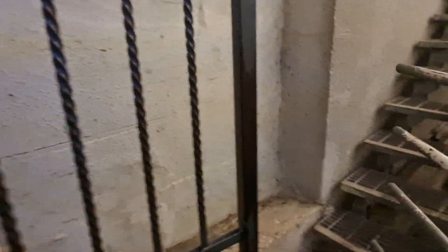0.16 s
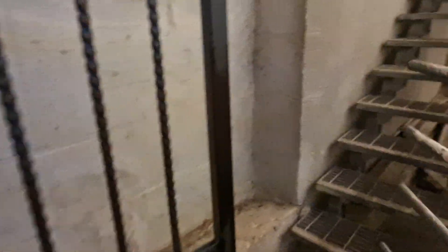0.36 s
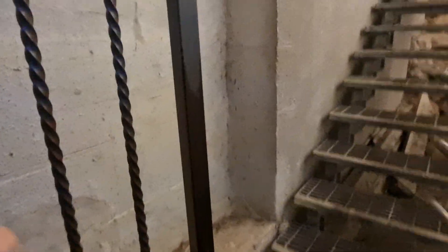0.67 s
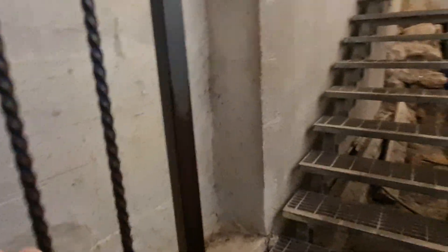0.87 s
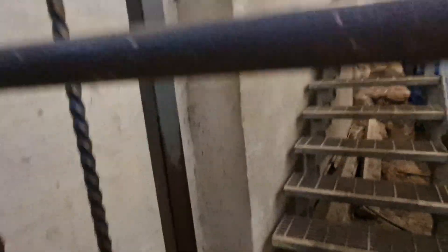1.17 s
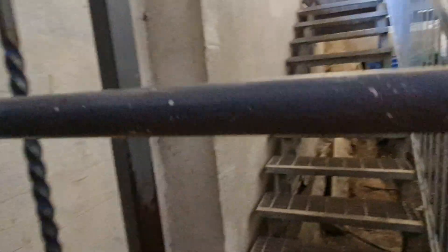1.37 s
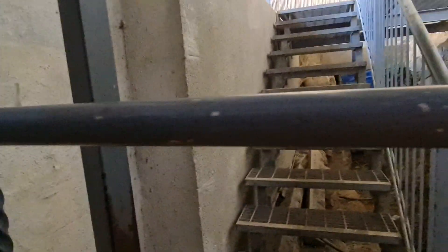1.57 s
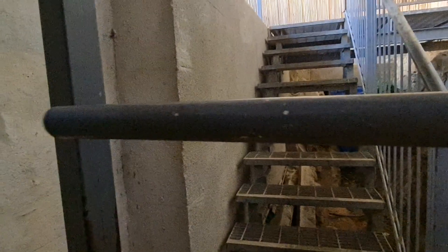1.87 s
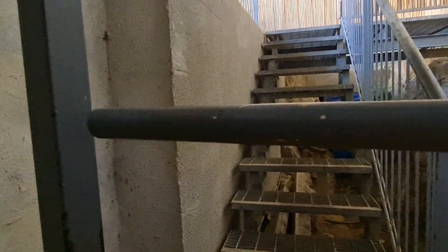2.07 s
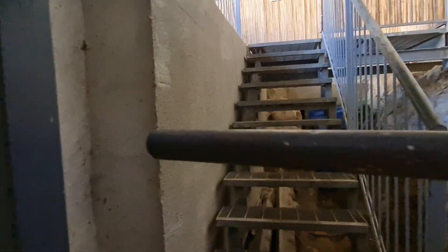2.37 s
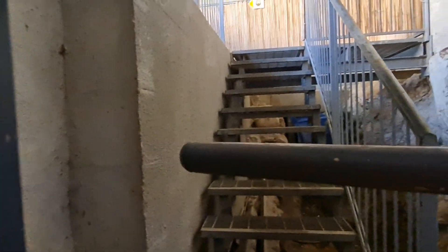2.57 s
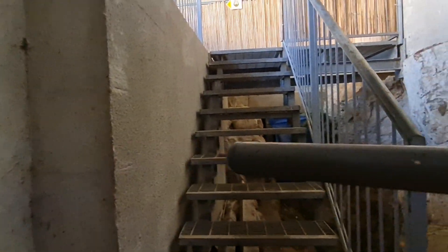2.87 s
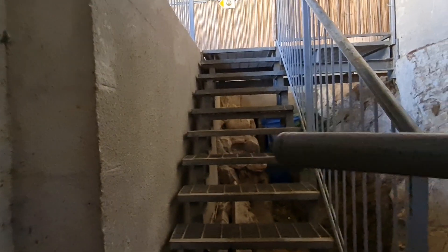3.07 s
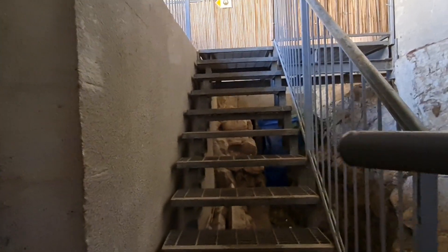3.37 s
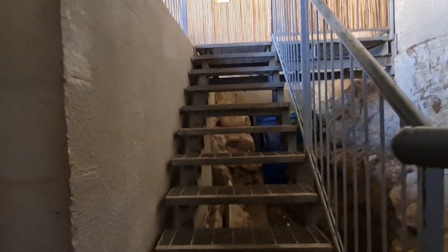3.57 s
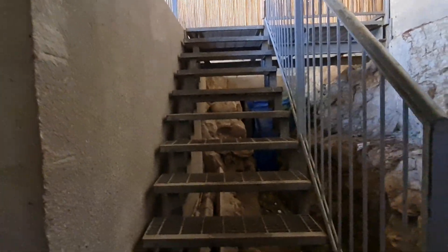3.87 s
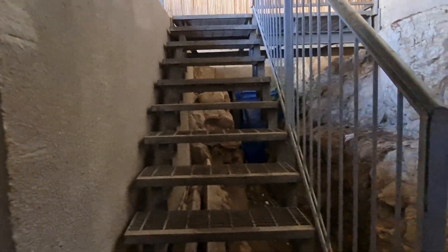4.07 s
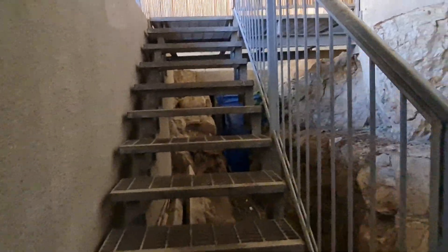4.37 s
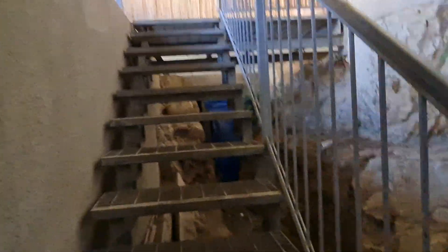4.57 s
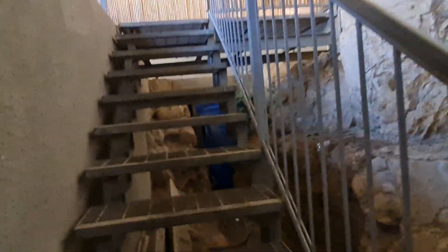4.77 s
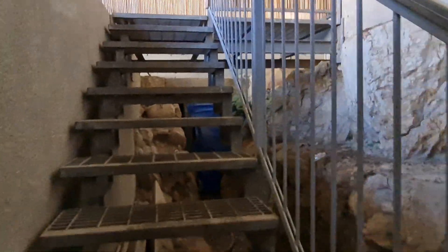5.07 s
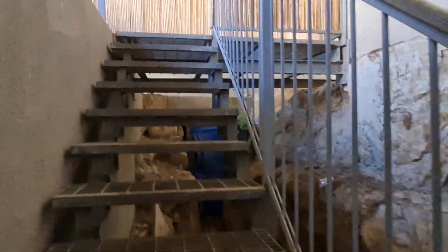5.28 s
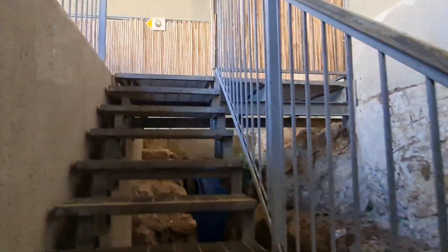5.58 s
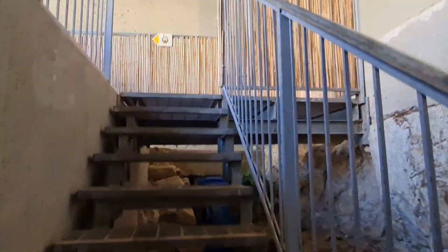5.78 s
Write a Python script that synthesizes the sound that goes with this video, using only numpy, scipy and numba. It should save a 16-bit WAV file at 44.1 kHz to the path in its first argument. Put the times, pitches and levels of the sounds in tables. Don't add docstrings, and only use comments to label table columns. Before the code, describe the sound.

A steel turnstile latch clanks about once a second, each blow ringing metallically through bars and grated stairs over faint traffic rumble.

```python
import sys
import numpy as np
from scipy import signal
from scipy.fft import rfft, irfft, next_fast_len
from scipy.io import wavfile
from scipy.ndimage import uniform_filter1d
from numba import njit

SR = 44100
rng = np.random.default_rng(int(sys.argv[2]) if len(sys.argv) > 2 else 0)


def invert_db(x):
    u = np.asarray(x, float) / 20
    return 10 ** u


def wav_record(signal):
    frames = np.transpose(np.atleast_2d(signal))
    bounded = np.clip(frames, -1, 1)
    quanta = np.round(bounded * 32767).astype(np.int16)
    wavfile.write(sys.argv[1], SR, quanta)


N = 261072

LEAD = 256
SCATTER = 0.13
# pitch_hz, level_db
PASSED_RANGE = [(110, -40), (320, 0), (16350, 0), (16650, -60)]


def curve(table, hz):
    table = np.array(table)
    return np.interp(np.log(np.maximum(hz, 1)), np.log(table[:, 0]), table[:, 1])


def colour(x, table):
    size = 2 * next_fast_len(x.shape[-1] // 2 + 1024)
    hz = np.arange(size // 2 + 1) * SR / size
    return irfft(rfft(x, size) * invert_db(curve(table, hz)), size)[..., :x.shape[-1]]


def unit(x):
    return x / np.sqrt(np.mean(x ** 2))


@njit
def ring(hz, gain, t60, size):
    p = np.exp(2j * np.pi * hz / SR - np.log(1000) / (t60 * SR))
    out = np.zeros(size)
    for k in range(len(hz)):
        z = gain[k] + 0j
        for i in range(min(size, int(1.3 * t60[k] * SR))):
            out[i] += z.imag
            z *= p[k]
    return out


def lines(modes, size, tubes=3):
    hz, db, t60 = np.repeat(np.array(modes, float).T, tubes, axis=1)
    is_extra_tube = np.arange(len(hz)) % tubes > 0
    detune = 0.004 * rng.standard_normal(len(hz)) * is_extra_tube
    return ring(hz * (1 + detune), invert_db(db - 4), np.clip(t60, 0.05, 1.8), size)


def add(out, s, sound):
    at = int(s * SR)
    sound = sound[:, max(-at, 0):N - at]
    out[:, max(at, 0):max(at, 0) + sound.shape[1]] += sound


def frame(size, count=3600):
    # pitch_hz, level_db per Hz
    cloud_level = [(200, -17), (638, -9.5), (3540, -6), (5500, -9), (8150, -5), (8350, -15), (14100, -16),
                   (16000, -35.5)]
    # pitch_hz, t60_s
    cloud_t60 = [(200, 3.8), (500, 1.47), (1200, 0.9), (2000, 1.11), (2600, 0.67), (3300, 0.75),
                 (5000, 0.52), (15000, 0.26)]
    # pitch_hz, width_hz, level_db
    crowds = [(1364, 250, 6.5), (7390, 560, 4)]
    chance = rng.standard_normal((count, 2)).T
    hz = 170 + 16300 * rng.random(count) ** 1.5
    damped = rng.random(count) < 0.5
    t60 = curve(cloud_t60, hz) * np.exp(SCATTER * chance[0]) * np.where(damped, 0.53, 1)
    db = curve(cloud_level, hz) + 11 - 2.5 * damped
    for at, width, crowd_db in crowds:
        db = db + crowd_db * np.exp(-((hz - at) / width) ** 2)
    crowding = (hz / 3000) ** 0.08
    gain = invert_db(db) * crowding * np.tanh(2 * chance[1]) / np.sqrt(count * t60)
    return ring(hz, gain, t60, size)


def rails(size, count=24):
    # pitch_hz, width_hz, level_db, t60_s
    rod_bands = [(330, 80, -19, 1.7), (900, 90, -16, 1.5), (1350, 120, -12, 1.2), (1450, 100, -4, .4),
                 (2620, 90, -17, .9), (4200, 120, -14, .7), (1750, 90, -14, 1.3), (1980, 90, -14, 1.4),
                 (2830, 60, -19, 1.2), (3040, 70, -8, 1.3), (4580, 90, -17, .78), (6200, 300, -17, .55),
                 (7780, 170, -14, .66)]
    hz, width, db, t60 = np.repeat(np.array(rod_bands, float).T, count, axis=1)
    chance = rng.standard_normal((3, len(hz)))
    gain = invert_db(db) * chance[1] / np.sqrt(count)
    t60 = np.clip(t60, 0.1, 1.8) * np.exp(SCATTER * chance[2])
    return ring(hz + width * chance[0], gain, t60, size)


def steel_bodies(size):
    # pitch_hz, level_db, t60_s
    posts = [(190, -16, 1.2), (240, -19, 1.6), (306, -17, 1.8), (350, -22, 1.3), (390, -21, 1.1),
             (484, -22, 1.0), (592, -21, 1.5), (631, -19, 1.1), (819, -19, .9), (884, -17, 1.2),
             (1420, -7, .5), (1568, -9, .45), (1728, -9, .55)]
    # pitch_hz, level_db, t60_s
    cage_bars = [(2103, -2, .55), (2151, -7, .55), (2253, -4, .5), (2376, -7, .4), (2522, -3, .45),
                 (2776, -12, .8), (2860, -10, .7), (3105, -12, .8), (3368, -12, .45)]
    railing_db, cage_db = -6.5, -12
    bodies = np.array([frame(size) + invert_db(railing_db) * rails(size) for _ in range(3)])
    return bodies + invert_db(railing_db) * lines(posts, size) + invert_db(cage_db) * lines(cage_bars, size)


def blow(bodies, own, db, low_db, bright_db, spread):
    walls_db, walls_t60_s = -13.5, 0.23
    port_lag = 18
    alike = 0.62
    t = np.arange(32768) / SR
    quick, slow, echo = rng.standard_normal((3, 3, len(t)))
    quick = quick * (1 - np.exp(-t / (0.04 * spread))) * np.exp(-(t / (0.72 * spread)) ** 1.73)
    slow = colour(slow, [(2800, -2.0), (4000, -19.5)]) * invert_db(-3)
    slow = slow * (1 - np.exp(-t / (0.72 * spread))) * np.exp(-(t / (1.78 * spread)) ** 4.6)
    echo = colour(echo, [(3000, 3.5), (4500, -8.5), (8000, -16.5), (10000, -21.5)])
    echo = echo * (1 - np.exp(-t / 0.01)) * invert_db(walls_db - 60 * t / walls_t60_s)
    push = (quick + slow + echo) / np.sqrt(spread * SR)
    heard = signal.fftconvolve(push, bodies, axes=1)
    heard[:, :len(own)] += [np.roll(own, lag) for lag in rng.integers(0, 200, 3)]
    shared, left, right = heard
    near = np.array([np.roll(shared, port_lag), shared])
    apart = colour(np.array([left, right]), [(200, -14), (800, 0)])
    sound = alike * near + np.sqrt(1 - alike ** 2) * apart
    tone = [(300, low_db - 5), (600, low_db), (1200, 0.0028), (3500, 0.012), (6000, bright_db)]
    return colour(np.pad(sound, ((0, 0), (LEAD, 0)))[:, :2 ** 16], tone) * invert_db(db + 5.0)


def latch_clanks(out, bodies):
    # start_s, peak_db, low_db, bright_db, spread_s
    latch_blows = [(-0.092, -12.5, -2, 0.027, 0.038),
                   (0.564, -13, -3, 1, 0.044),
        (1.301, -14, 0.5, 2, 0.039),
        (2.1513, -13.5, -0.5, -0.5, 0.037),
        (3.1566, -14.5, 1, 1, 0.044),
        (4.119, -13.5, -0.5, 1, 0.041),
        (5.2013, -15.5, 1, 0.5, 0.054),
    ]
    # pitch_hz, level_db, t60_s
    arms = [
        [(1916, -16, 0.93), (2110, 0, 0.3), (2261, -11, 0.58), (2772, -14, 0.75), (2859, -8, 0.53)],
        [(1550, -1, 0.35), (2148, -2, 0.38), (2406, -3, 0.38), (2519, 0, 0.33), (2907, -14, 1.6)],
        [(1378, -8, 0.65), (2153, -7, 1.5), (2256, 0, 0.47), (2654, -4, 0.44), (3074, -9, 1.1)],
        [(1421, 0, 0.39), (2250, -5, 0.68), (2525, -8, 0.58), (2821, -8, 0.6), (3025, -6, 0.45)],
        [(1432, -13, 0.81), (2105, 0, 0.26), (2519, -12, 0.68), (2859, -14, 1.7), (3015, -14, 1.2)],
        [(1416, -12, 0.94), (1728, -11, 0.93), (2121, 0, 0.27), (2492, -8, 0.46), (2778, -16, 1.1)],
        [(1340, 0, 0.57), (1798, -2, 0.71), (2363, -2, 0.47), (2514, -1, 0.55), (2815, -4, 0.86)],
    ]
    arm_levels = [-5.5, -5, -4, -6.5, -8, -6, -5.5]
    # pitch_hz, level_db, t60_s
    thin_rods = [(943, -19, 1.9), (1314, -16, 1.3), (1744, -17, 1.4), (1917, -11, 1.5), (1997, -17, 1.5),
                 (2095, -18, 1.2), (2816, -14, 1.7), (2910, -12, 1.1), (2981, -16, 1.4), (3016, -12, 1.2),
                 (3038, -14, 1.1), (3085, -16, 1.1), (4250, -22, .65), (4580, -18, .7)]
    # pitch_hz, level_db, t60_s
    freed_rods = [
        [(1916, -7, 0.99), (1992, -10, 2.2), (2153, -1, 0.37), (2266, 0, 0.37), (3058, -4, 0.96)],
        [(1653, -8, 1.1), (1916, -11, 4.6), (2724, -5, 0.78), (2907, 0, 0.54), (3015, -13, 5.0)],
        [(883, -11, 1.1), (1943, -22, 5.0), (2153, 0, 0.88), (2815, -23, 5.0), (3068, -3, 0.54)],
        [(1314, -9, 1.3), (1916, 0, 0.69), (2632, -17, 0.9), (2821, -8, 1.2), (3020, -12, 0.92)],
        [(1916, -3, 1.1), (2110, -4, 0.65), (2525, -7, 0.57), (2859, -4, 0.8), (3015, 0, 0.91)],
        [(1916, -4, 1.1), (2008, -7, 1.3), (2094, -13, 1.3), (2859, -13, 1.2), (3031, 0, 0.62)],
        [(894, -9, 0.99), (1744, -5, 0.92), (1916, 0, 0.97), (2815, -3, 1.4), (2912, -7, 0.96)],
    ]
    freed_levels = [-30, -26.5, -30.5, -36, -32, -32, -25.5]
    freed_at_s = 0.3
    rods_db, rods_luck_db = -9.5, 1.5
    arm_bloom_s, rods_bloom_s = 0.032, 0.13
    size = bodies.shape[1]
    t = np.arange(size) / SR
    positions = zip(latch_blows, arms, arm_levels, freed_rods, freed_levels)
    for (s, *how), arm, arm_db, freed, freed_db in positions:
        luck = np.outer(rng.standard_normal(len(thin_rods)), [0, rods_luck_db, 0])
        rods = np.array(thin_rods) + luck
        freed = [(hz, db + freed_db + 60 * freed_at_s / np.clip(t60, 0.85, 1.8), max(t60, 0.85))
                 for hz, db, t60 in freed]
        arm_ring = invert_db(arm_db) * lines(arm, size, 1.8) * (1 - np.exp(-t / arm_bloom_s))
        rod_ring = invert_db(rods_db) * lines(rods, size, 2) + lines(freed, size, 1.8)
        own = arm_ring + rod_ring * (1 - np.exp(-t / rods_bloom_s)) ** 2
        add(out, s - LEAD / SR - 0.0055, blow(bodies, own, *how))


def pawl_touches(out, bodies):
    # start_s, peak_db, low_db, bright_db, spread_s
    touches = [
        (0.5203, -33.5, -9.5, -11, 0.02),
        (1.269, -49.5, -14.5, 2, .008),
        (2.085, -53, -0.5, -12.5, 0.0088),
        (3.035, -36, -8.5, -22.5, 0.013),
        (3.056, -35.5, -4, -20, 0.032),
    ]
    choked_t60_s = 0.033
    size = bodies.shape[1]
    t = np.arange(size) / SR
    choked = bodies * invert_db(-60 * t / choked_t60_s)
    choked = colour(choked, [(1500, 0.5), (2200, 1), (8000, -3.0), (11000, -8.5)])
    for s, *how in touches:
        add(out, s - LEAD / SR, blow(choked, np.zeros(size), *how))


def turnstile():
    # pitch_hz, level_db
    side_balance = [(300, -2), (1000, -2.5), (2500, -4.5), (5500, -5), (7000, -1.3)]
    out = np.zeros((2, N))
    bodies = steel_bodies(int(1.4 * SR))
    latch_clanks(out, bodies)
    pawl_touches(out, bodies)
    ports = [colour(out[k], [(hz, db * (0.5 - k)) for hz, db in side_balance]) for k in range(2)]
    return colour(np.array(ports), PASSED_RANGE)


def slow_drift():
    return unit(uniform_filter1d(rng.standard_normal(N), SR // 5))


def traffic(wander):
    # pitch_hz, level_db per Hz
    hum_tone = [(41, -42), (70, -13), (250, 0.5), (500, -4), (900, -11), (1500, -22.5), (3100, -22.5),
                (3600, -35.5), (7400, -38), (16000, -61)]
    mid, side = rng.standard_normal((2, N))
    side = colour(side, [(130, -15), (250, -7), (500, -2)])
    hum = unit(colour(np.array([mid + side, mid - side]), hum_tone))
    return invert_db(-51.5 + 1.5 * wander) * hum


def wind():
    # middle_s, half_length_s, level_db
    gusts = [(0.0, 0.071, -63), (.22, .1, -69), (1.5, .15, -76), (2.26, 0.11, -73), (2.77, 0.052, -51),
             (3.0, 0.083, -61.5), (3.45, 0.14, -66), (5.298, .2, -58.5), (5.549, 0.079, -63)]
    calm_db = -73
    t = np.arange(N) / SR
    gust, leak = rng.standard_normal((2, N))
    ports = np.array([0.55 * gust + 0.24 * leak, gust - 0.2 * leak])
    rumble = unit(colour(ports, [(25, -27.5), (40, 21.5), (58, 20.5), (90, 13.5), (130, 7), (170, -30.5)]))
    puffs = invert_db(calm_db) + sum(invert_db(db) * np.exp(-((t - s) / half) ** 2) for s, half, db in gusts)
    return rumble * puffs


def rustle():
    # start_s, length_s, level_db, brightness_db
    rubs = [(0.406, 0.1, -57, 1), (0.998, 0.078, -59, 0), (1.133, 0.12, -68, -2.5), (1.575, 0.14, -60, -2),
            (2.032, 0.087, -60, 0), (2.293, 0.15, -56, 11), (2.543, .09, -65, 0), (2.593, 0.28, -72, -1),
            (2.696, 0.13, -59.5, 1), (2.79, 0.12, -69, -5), (3.056, 0.15, -59.5, 1), (3.88, .07, -75.5, 3),
            (3.95, 0.074, -71, 0.5), (4.55, 0.13, -65, -3), (4.65, 0.16, -61.5, -4), (4.782, 0.27, -74, 4),
            (4.939, 0.36, -68, -2), (5.669, 0.24, -61, -9.5)]
    out = np.zeros((2, N))
    for s, length, db, bright_db in rubs:
        size = 2 * int(length * SR / 2)
        grain = rng.standard_normal((2, 16384)) * invert_db(2 * rng.exponential(size=16384))
        tone = [(800, -20.5), (3000, 3.0), (7000, 5.5),
                (9000, bright_db - 1.5), (15500, bright_db - 2.5), (15900, -41.5)]
        grain = unit(colour(grain, tone))
        swell = np.sin(np.pi * np.sqrt(np.linspace(0, 1, size))) ** 2
        add(out, s, invert_db(db) * grain[:, :size] * swell)
    return out


def ticks():
    # start_s, peak_db, left_minus_right_db
    snaps = [
        (2.8674, -53, -22),
        (2.9914, -69, -6),
        (3.7201, -59.5, -13),
        (4.6806, -59.5, -7),
        (4.9427, -50, -15),
    ]
    out, t = np.zeros((2, N)), np.arange(1024) / SR
    for s, db, pan_db in snaps:
        snap = colour(rng.standard_normal(1024), [(2000, -17), (5000, -0.5), (11000, -3)])
        snap = snap * np.exp(-t / 0.0016)
        add(out, s - 0.001, snap[None] * invert_db(db + np.array([[pan_db], [-pan_db]]) / 2))
    return out


def far_engine(wander):
    # start_s, end_s
    start_s, end_s = (3.55, 4.8)
    pitch_hz, fade_s = 45.5, 0.08
    t = np.arange(N) / SR
    load = (np.tanh((t - start_s) / fade_s) - np.tanh((t - end_s) / fade_s)) / 2
    turn = 2 * np.pi * np.cumsum(pitch_hz * (1 + 0.033 * slow_drift())) / SR
    tone = np.sin(turn) + invert_db(-5.5) * np.sin(2.5 * turn)
    return tone * load * invert_db(-55 + 1.5 * wander) * np.array([[0.8], [1.2]])


def scene():
    wander = slow_drift()
    return turnstile() + traffic(wander) + wind() + rustle() + ticks() + far_engine(wander)


def low_pass(x):
    return signal.sosfilt(signal.butter(12, 16510, fs=SR, output="sos"), x)


def record(dry):
    over = np.maximum(np.abs(dry) - 0.7, 0)
    held = dry - np.sign(dry) * (over - 0.3 * np.tanh(over / 0.3))
    mix = colour(held, PASSED_RANGE[2:])
    return low_pass(mix)


dry = scene()
out = record(dry)
wav_record(out)
```